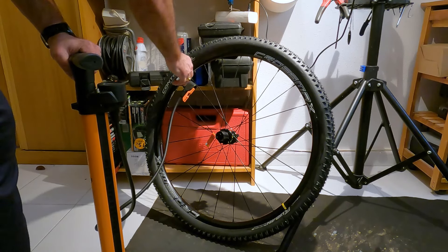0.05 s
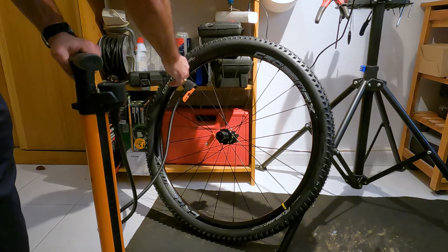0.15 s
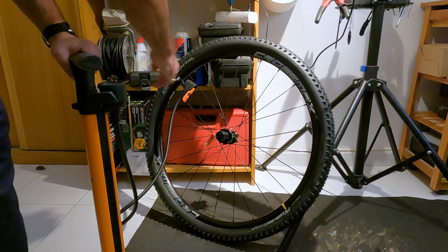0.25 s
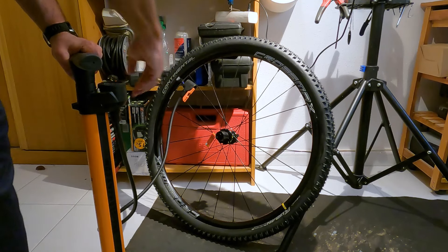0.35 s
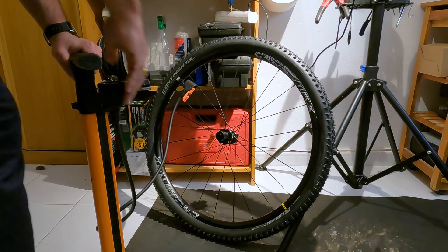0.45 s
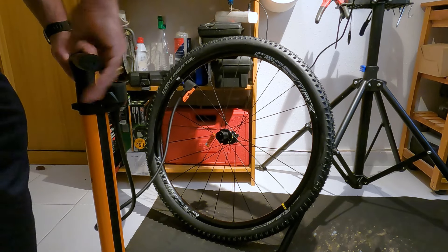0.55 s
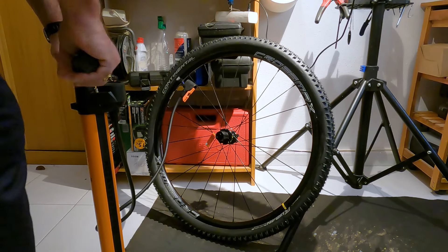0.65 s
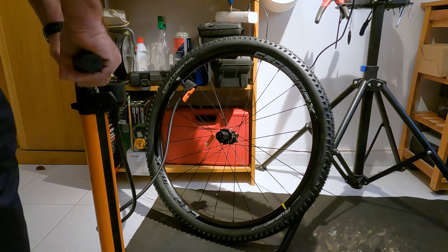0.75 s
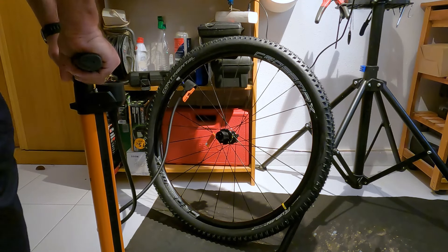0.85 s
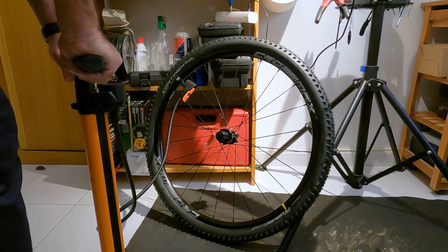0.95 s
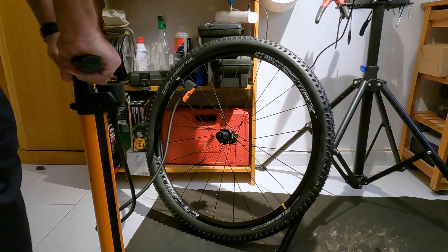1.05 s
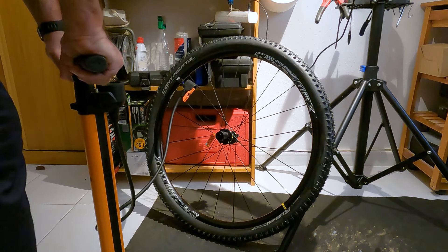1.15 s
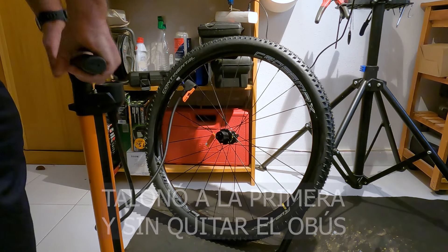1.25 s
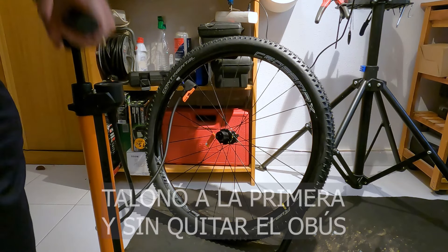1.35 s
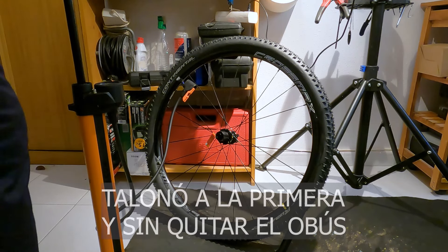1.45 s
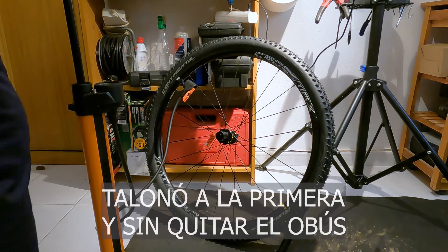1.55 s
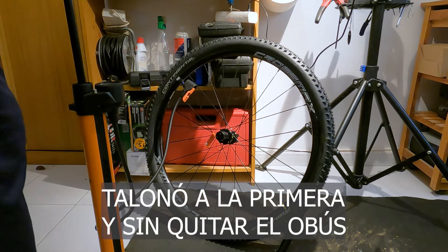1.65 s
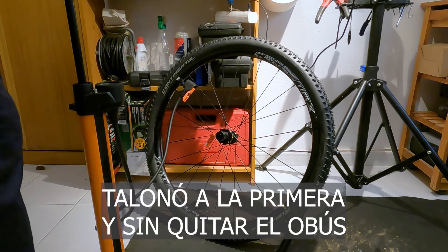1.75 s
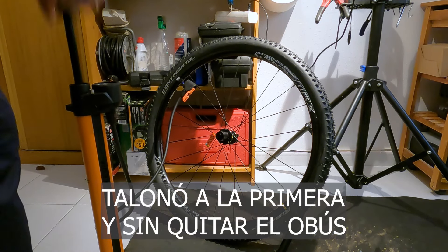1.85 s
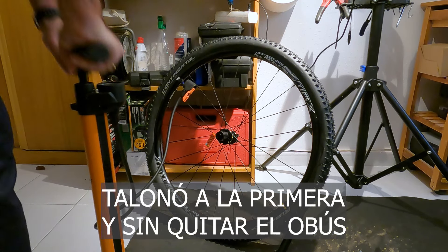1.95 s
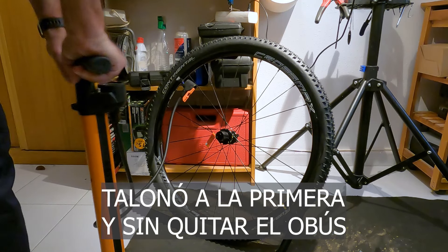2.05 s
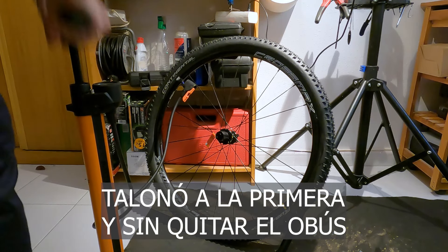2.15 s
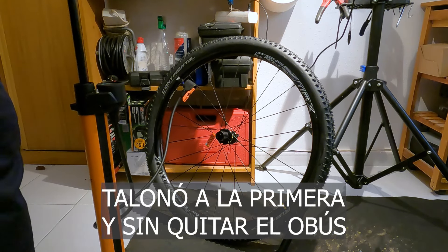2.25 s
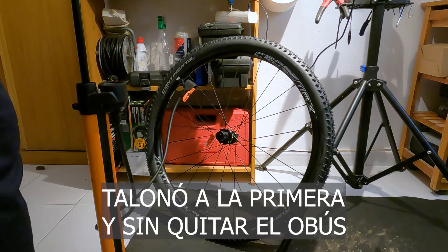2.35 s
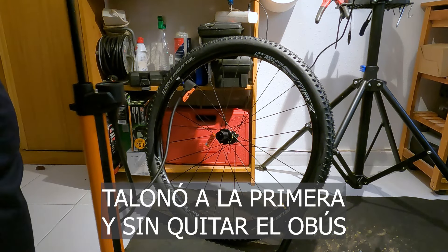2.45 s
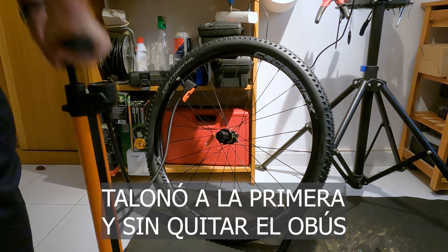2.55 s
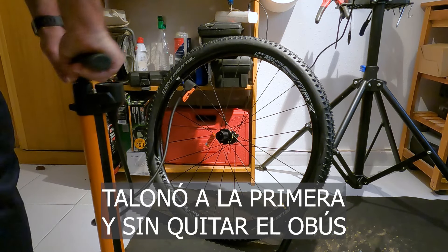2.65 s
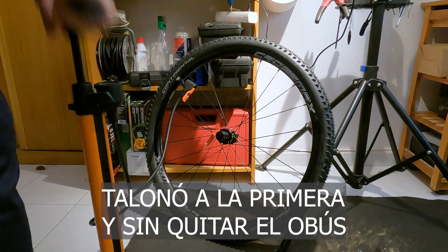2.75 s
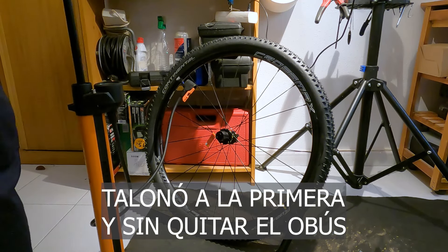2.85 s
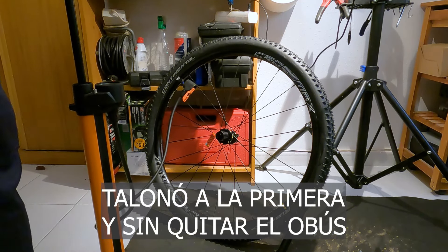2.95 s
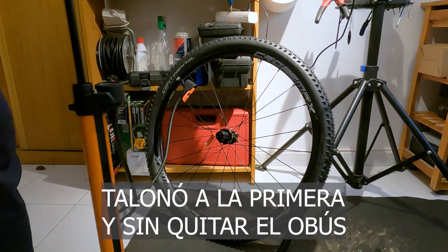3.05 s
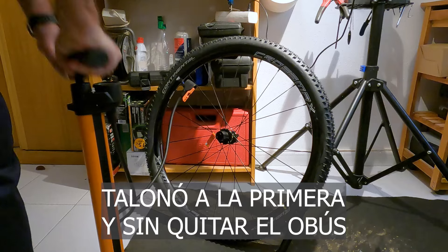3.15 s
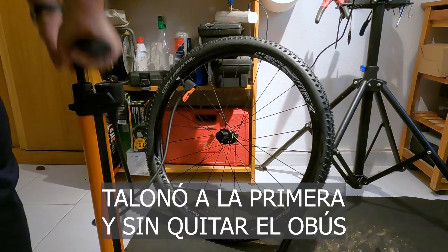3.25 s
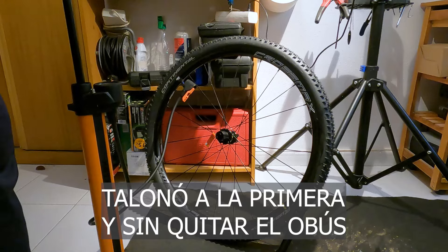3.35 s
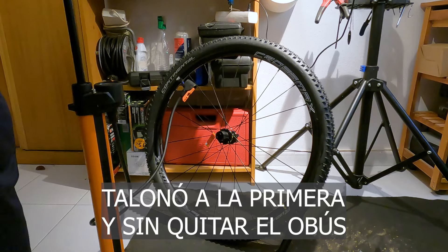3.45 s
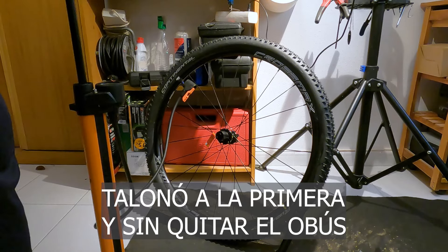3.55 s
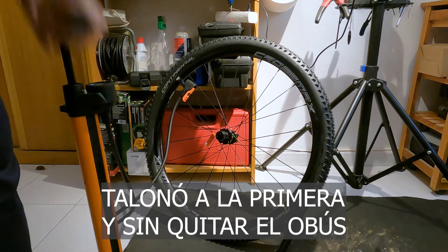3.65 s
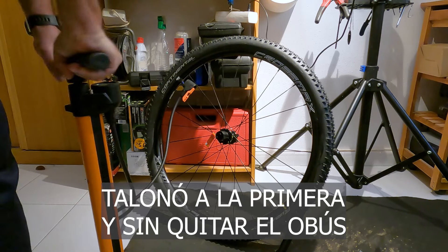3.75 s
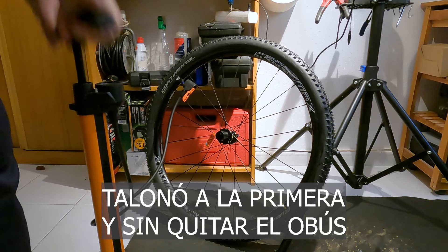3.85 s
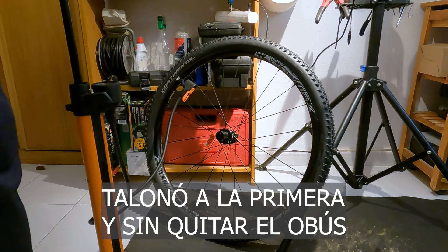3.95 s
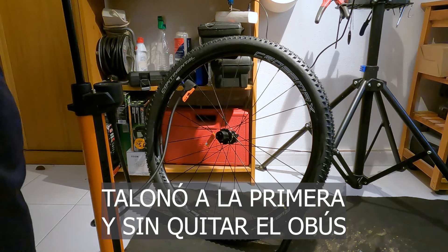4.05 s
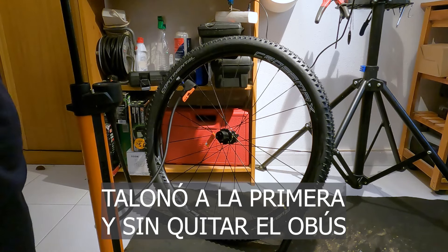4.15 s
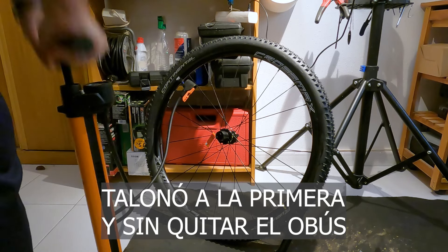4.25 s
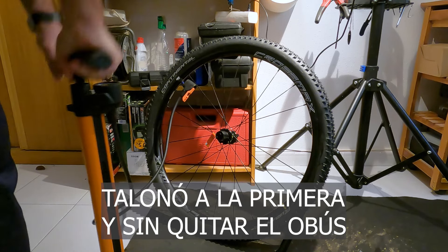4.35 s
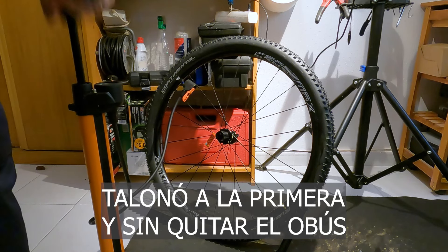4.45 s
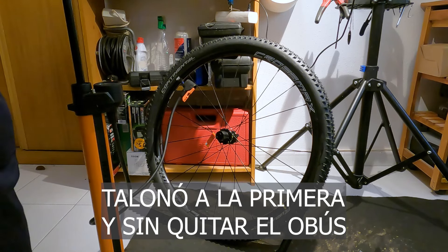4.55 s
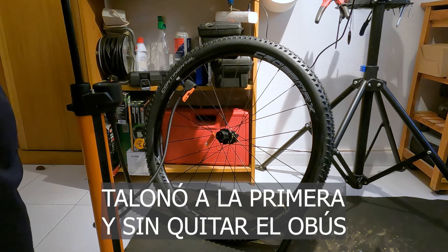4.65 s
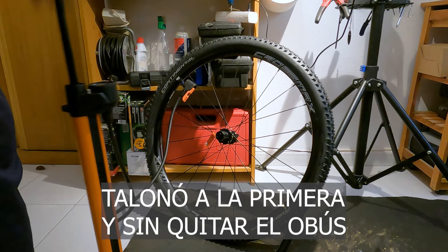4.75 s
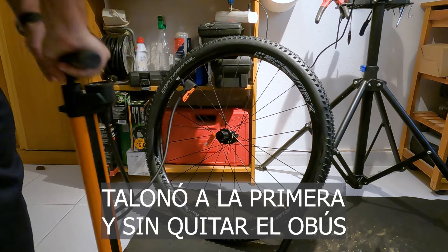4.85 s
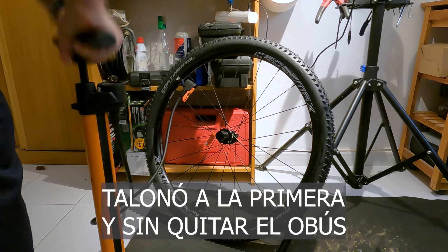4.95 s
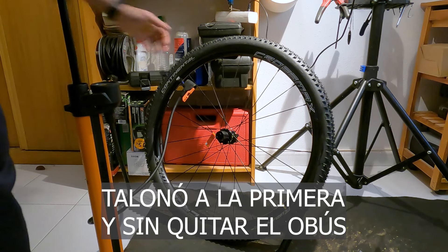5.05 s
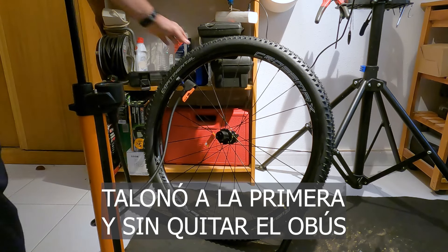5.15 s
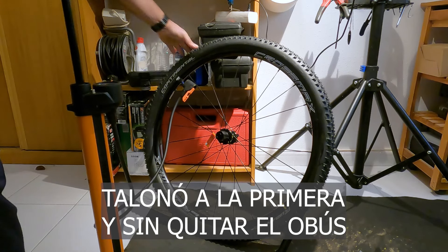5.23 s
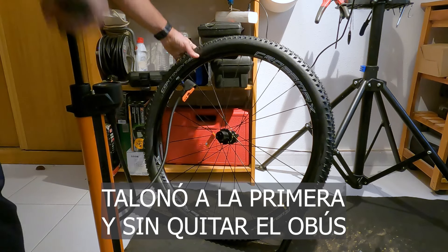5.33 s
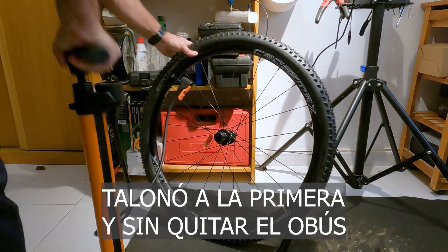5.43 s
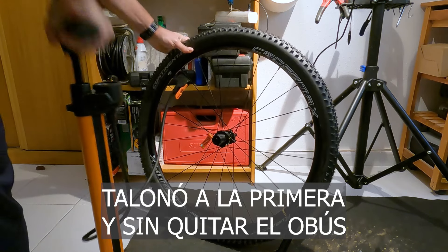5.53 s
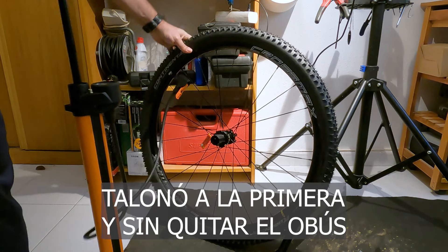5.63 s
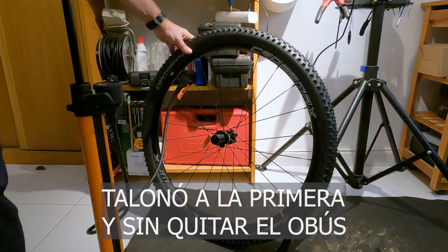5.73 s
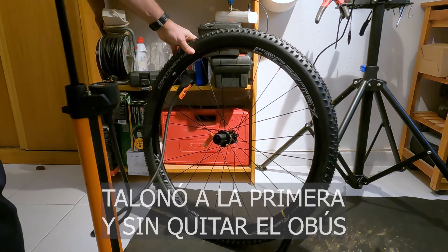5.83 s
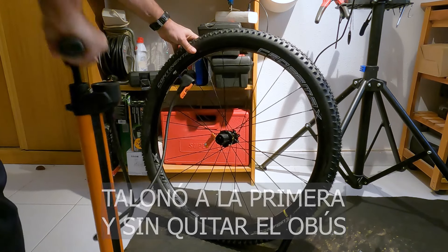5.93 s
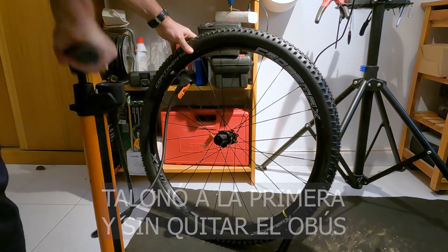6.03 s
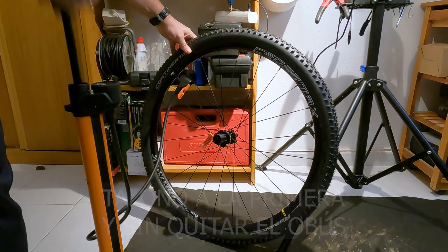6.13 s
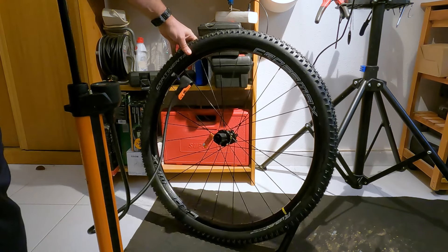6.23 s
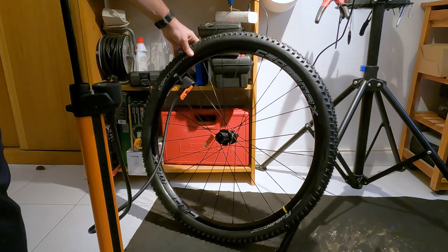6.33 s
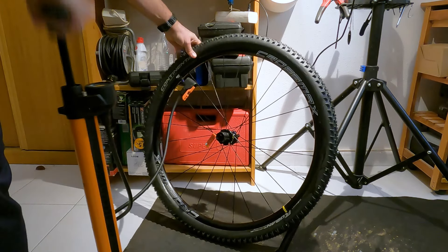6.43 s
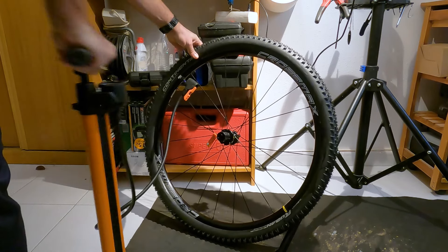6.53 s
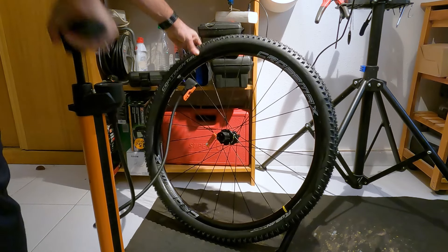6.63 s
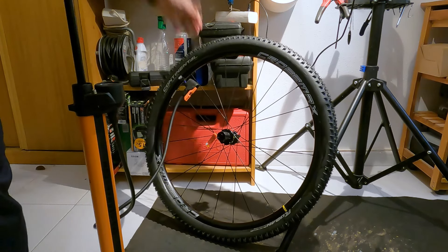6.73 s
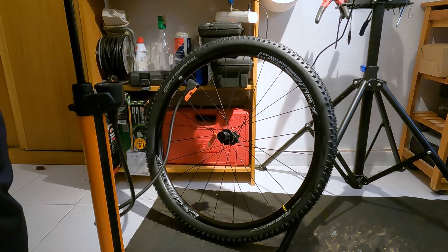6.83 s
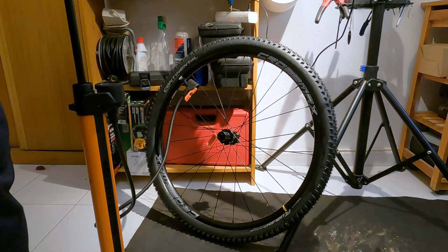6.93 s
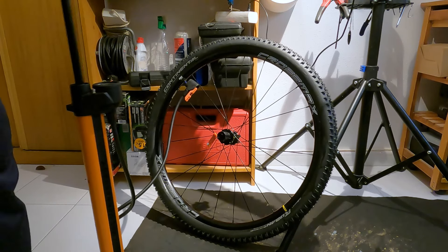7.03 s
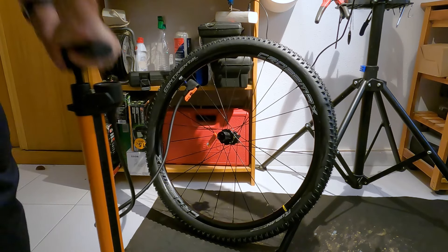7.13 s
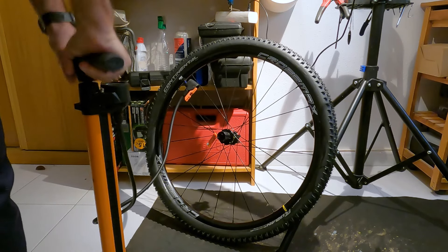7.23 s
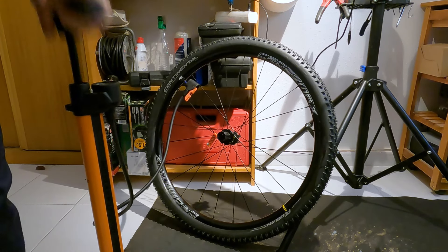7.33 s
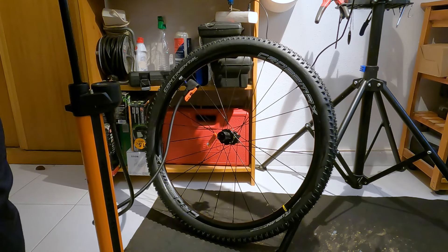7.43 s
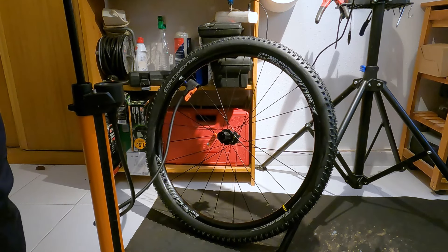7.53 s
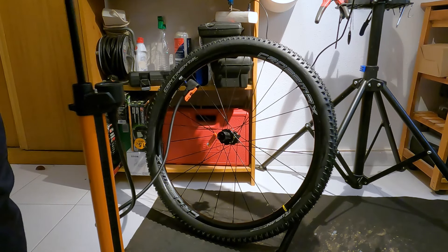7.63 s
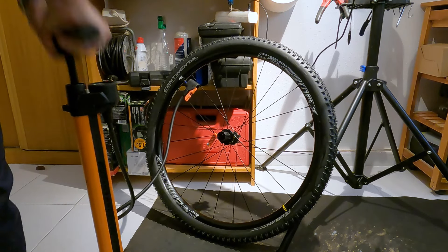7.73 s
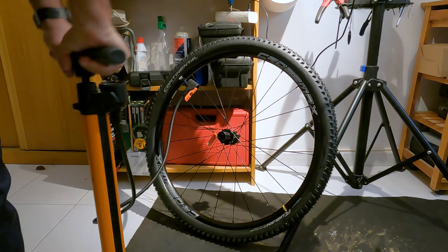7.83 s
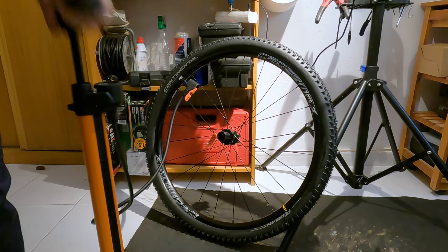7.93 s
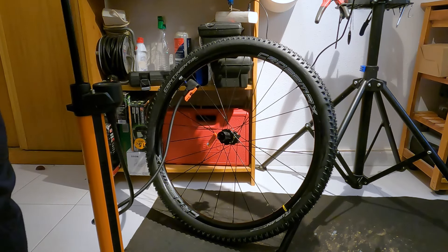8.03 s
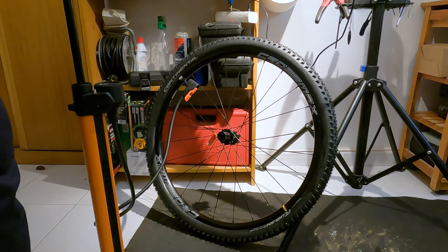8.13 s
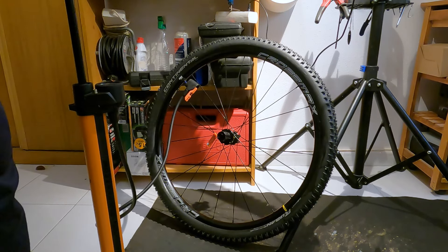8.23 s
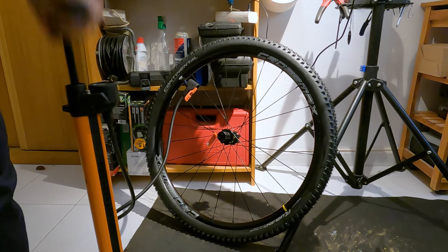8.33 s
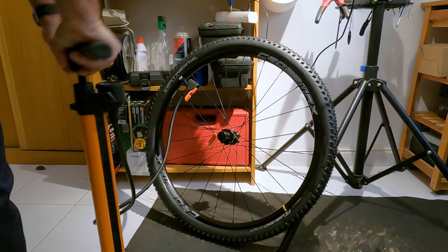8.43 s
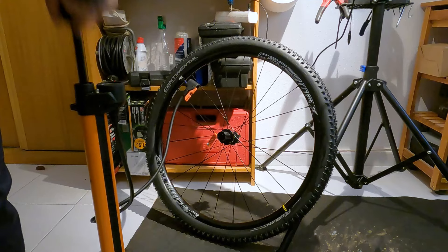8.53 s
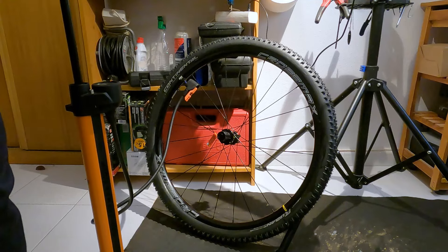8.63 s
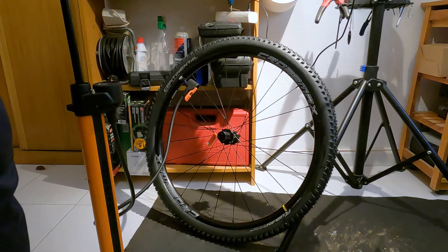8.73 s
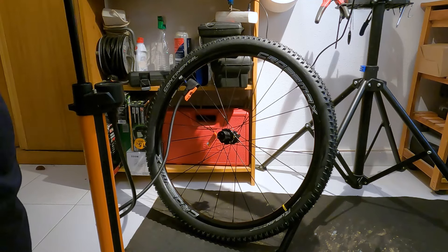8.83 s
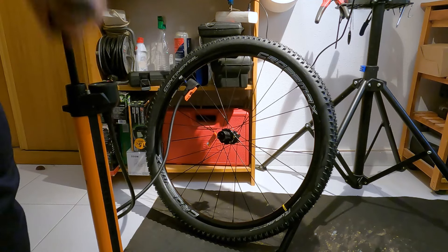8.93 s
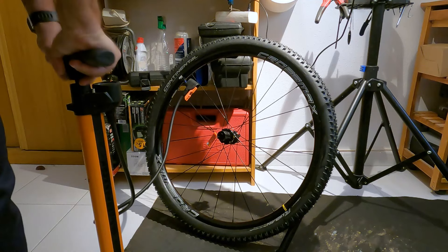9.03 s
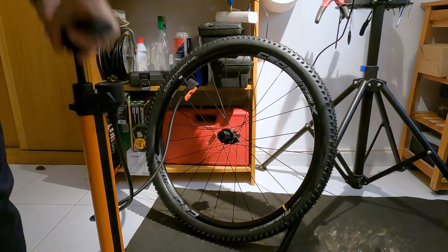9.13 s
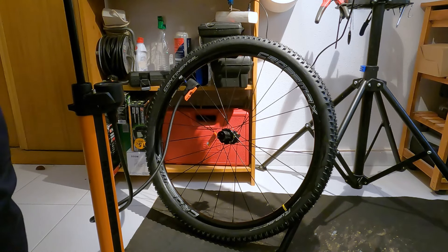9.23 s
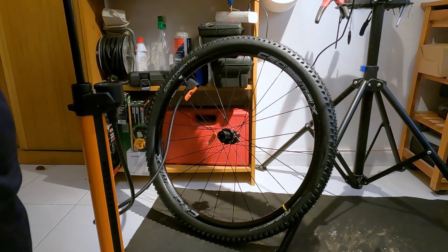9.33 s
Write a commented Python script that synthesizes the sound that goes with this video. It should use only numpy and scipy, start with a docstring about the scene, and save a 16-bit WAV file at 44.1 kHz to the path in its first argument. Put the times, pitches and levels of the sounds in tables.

```python
"""Pumping up a bicycle tyre

A floor pump seats a tyre on its rim in a small workshop. Shaped noise makes the hissing air, scraping seal,
palms and faint air between strokes, sliding shoe and rumbling floor. Short noise bursts and fading tones make
the clicks, knocks, clunks, thuds and ticks; the bead pops onto the rim with a crack and a hollow boom, and one
spoke hums on.
"""
import sys
import numpy as np
from scipy import signal
from scipy.fft import rfft, irfft, next_fast_len
from scipy.io import wavfile
from scipy.ndimage import uniform_filter1d, map_coordinates

SR = 44100
rng = np.random.default_rng(int(sys.argv[2]) if len(sys.argv) > 2 else 0)


def generate_wav(sig):
    """Save sig (samples, or channels by samples) to the path in sys.argv[1] as 16-bit PCM at SR."""
    pcm = np.round(np.clip(np.atleast_2d(sig).T, -1, 1) * 32767).astype(np.int16)
    wavfile.write(sys.argv[1], SR, pcm)


N = 413658

# pump strokes: start_s, rise_s (time to the fastest flow), valve_db (hiss), barrel_db (rush); relative levels
PUMP_STROKES = [(1.42, .27, -57, -49), (1.895, 0.23, -39, -41.5), (2.529, 0.23, -39, -38),
                (3.116, 0.19, -35.5, -35.5), (3.587, 0.3, -38, -35), (4.184, 0.27, -37.5, -37.5),
                (4.715, .29, -40, -37), (5.168, 0.4, -41, -38.5), (5.845, .28, -43, -37),
                (6.464, 0.23, -42.5, -38.5), (6.97, 0.33, -38.5, -38), (7.721, .22, -38.5, -38),
                (8.304, 0.25, -37.5, -38), (8.922, 0.26, -36, -35.5)]
# colour of a hard little snap: pitch_hz, level_db (per Hz)
SNAP_COLOUR = [(300, -43), (1300, -4), (2400, 2), (3200, 8), (5500, 15.5), (7000, 1), (8500, 2.5),
               (9600, 1.5), (11000, -3), (15000, -18)]


def amp(db):
    """Turn decibels into a gain."""
    return 10 ** (np.asarray(db) / 20)


def unit(x):
    """Scale a sound to an rms of 1."""
    return x / np.sqrt(np.mean(x ** 2) + 1e-20)


def along(points, hz):
    """Read values between (Hz, value) points, with frequency on a log axis."""
    f, v = np.transpose(points)
    return np.interp(np.log(hz + 1), np.log(f + 1), v)


def wobble(rate):
    """Draw a smooth random curve through `rate` random points a second."""
    points = rng.standard_normal(int(N * rate / SR) + 4)
    return map_coordinates(points, [np.arange(N) * rate / SR])


def filtered(x, response):
    """Multiply the spectrum of x by a response that depends on frequency."""
    n = x.shape[-1]
    padded = next_fast_len(n + SR // 10)
    hz = np.fft.rfftfreq(padded, 1 / SR)
    return irfft(rfft(x, padded) * response(hz), padded)[..., :n]


def spread(pair):
    """Turn two unrelated signals into a sound from all around, heard by two close microphones."""
    # stereo width: pitch_hz, level_db (side against middle)
    width = [(60, -28), (150, -12), (500, -10), (2000, -6.5), (5000, -6.5), (8000, -13.5), (12000, -6.5)]
    side = filtered(pair[1], lambda hz: amp(along(width, hz)))
    return np.array([pair[0] + side, pair[0] - side])


def rush(spectrum, patchy_db):
    """Make wide, coloured noise of rms 1 whose gain varies in random patches of time and pitch."""
    z = signal.stft(rng.standard_normal((2, N)), nperseg=512)[2]
    field = uniform_filter1d(rng.standard_normal(z.shape[1:]), size=5, axis=0)
    field = uniform_filter1d(field, size=9, axis=1)
    pair = signal.istft(z * amp(patchy_db * unit(field)), nperseg=512)[1][:, :N]
    coloured = filtered(pair, lambda hz: amp(along(spectrum, hz)))
    return unit(spread(coloured))


def fade(t60, attack):
    """Shape one blow: a quick rise, then a fall of 60 dB in t60 seconds."""
    t = np.arange(SR * 3 // 4) / SR
    return amp(-60 * t / t60) * (1 - np.exp(-t / attack))


def burst(colour_db, t60, attack):
    """Make a dying puff of coloured noise."""
    shape = fade(t60, attack)
    noise = filtered(rng.standard_normal(len(shape)), lambda hz: amp(colour_db(hz)))
    return shape * unit(noise)


def ring(modes, attack, scatter_db, detune):
    """Strike (Hz, dB, t60 s) modes at slightly new strengths and pitches; rms near 1 before the fade."""
    t = np.arange(SR * 3 // 4) / SR
    chance = rng.standard_normal((len(modes), 3))
    sizes = amp(np.array(modes)[:, 1] + scatter_db * chance[:, 0])
    waves = []
    for (hz, _, t60), (_, pitch_shift, phase) in zip(modes, chance):
        tone = np.sin(2 * np.pi * (hz * (1 + detune * pitch_shift) * t + phase))
        waves.append(tone * fade(t60, attack))
    return np.sqrt(2) * sizes @ np.array(waves) / np.linalg.norm(sizes)


def in_room(x, wet_db):
    """Add the workshop's answer: an echo tail of fresh noise that dies at its own rate at each pitch."""
    # workshop echo: pitch_hz, t60_s (time to fall 60 dB)
    echo_times = [(100, 0.32), (500, 0.39), (2000, 0.34), (6000, 0.45), (14000, 0.45)]
    hz, t, z = signal.stft(rng.standard_normal((2, SR // 2)), SR, nperseg=256)
    build_up = 1 - np.exp(-t / 0.0036)
    decay = amp(-60 * t / along(echo_times, hz)[:, None])
    tail = signal.istft(z * build_up * decay, SR, nperseg=256)[1]
    tail = spread(tail / np.linalg.norm(tail[0]))
    return x + amp(wet_db) * signal.fftconvolve(x[None], tail, axes=1)[:, :len(x)]


def add(track, s, sound):
    """Mix a sound into the track from s seconds on."""
    part = track[:, max(round(s * SR), 0):][:, :sound.shape[-1]]
    part += sound[..., :part.shape[1]]


def swell(s, length, crest):
    """Rise and fall smoothly, strongest at the given share of the length."""
    top = s + length * np.clip(crest, .05, .95)
    phase = np.interp(np.arange(N) / SR, [s, top, s + length], [0, np.pi / 2, np.pi])
    return np.sin(phase) ** 2


def chatter(contact):
    """Let a loose part hit and rebound twice after uneven, very short gaps, each contact weaker."""
    mean_gap_s, loss_db = .0028, 9.5
    gaps = mean_gap_s * rng.uniform(.5, 1.5, 2)
    sound = contact()
    for k, s in enumerate(np.cumsum(gaps), 1):
        later = np.pad(contact(), (round(s * SR), 0))[:len(sound)]
        sound = sound + amp(-loss_db * k) * later
    return sound


def off_tiles(x):
    """The tiled floor throws a fifth of the sound back 5.35 ms later."""
    return filtered(x, lambda hz: 1 + .2 * np.exp(-2j * np.pi * hz * .00535))


def quiet_workshop():
    """A faint, steady bed of coloured noise is the workshop's background."""
    # background colour: pitch_hz, level_db (per Hz)
    quiet_colour = [(25, -22), (86, -25), (202, -2.5), (360, -5.5), (673, -36), (1100, -11), (1670, -9.5),
                    (1860, -19), (2400, -14), (2650, -11), (3000, -23), (5000, -19), (9000, -29),
                    (11300, -25), (15000, -52)]
    return amp(-63.5) * rush(quiet_colour, patchy_db=.4)


def foot():
    """Weight shifts make the pump's foot rumble on the floor; the room's lowest mode swells a little later."""
    # shifts of weight: start_s, length_s, rumble_db (floor), boom_db (room)
    shifts = [(0.01, 0.33, -55.5, -51), (0.484, 0.41, -53.5, -45), (1.056, .29, -54, -42),
              (1.407, 0.29, -53, -50), (1.952, 0.7, -62, -42.5), (2.498, 0.26, -50, -40),
              (2.837, 0.29, -45.5, -53), (3.355, 0.3, -40.5, -35), (3.65, 0.29, -53, -48.5),
              (3.858, 0.33, -46, -39.5), (4.423, 0.35, -46.5, -34), (4.984, 0.36, -55, -44),
              (5.497, 0.51, -50, -58), (5.73, 0.34, -59, -48), (6.078, 0.21, -54, -43.5),
              (6.205, 0.27, -55.5, -50), (6.673, 0.26, -43, -43), (6.922, 0.33, -45.5, -64),
              (7.197, 0.32, -44, -62.5), (7.706, 0.19, -52, -47.5), (8.58, 0.34, -47.5, -75),
              (8.93, 0.2, -42.5, -54), (9.138, 0.35, -42.5, -38)]
    # floor colour: pitch_hz, level_db (per Hz)
    floor_colour = [(25, 1.5), (45, -4), (80, -8), (100, 3), (122, -6), (155, -1), (200, -8), (300, -11.5),
                    (500, -16), (900, -22.5), (2000, -36)]
    rumble_crest, boom_crest = 0.15, 0.36  # share of a swell's length at which it is strongest
    rest_db, lean_in_s = -58.5, 0.51  # rumble between shifts; it builds as weight comes onto the pump
    rumble = sum(amp(db) * swell(s, length, rumble_crest) for s, length, db, _ in shifts)
    boom = sum(amp(db) * swell(s, length, boom_crest) for s, length, _, db in shifts)
    resting = amp(rest_db) * np.clip(np.arange(N) / SR / lean_in_s, 0, 1)
    mode_hz = 62.5 + 3 * wobble(15)
    mode = np.sqrt(2) * np.sin(2 * np.pi * np.cumsum(mode_hz) / SR)
    tiles = rush(floor_colour, patchy_db=2.2)
    return boom * mode + (rumble + resting) * tiles


def shoe():
    """A sole slides briefly over the tiles as the stance is taken: one swell of noise."""
    # sole colour: pitch_hz, level_db (per Hz)
    sole_colour = [(150, -5), (320, -8), (570, 4), (830, -7), (980, 6), (1250, -7), (1520, 1), (1900, -2),
                   (2200, -2.5), (4000, -5), (5500, -7), (7500, -6), (10000, -17.5), (15000, -23)]
    slide = swell(0.775, 0.34, crest=0.42) ** 2.6  # the power narrows the swell
    return amp(-44) * slide * rush(sole_colour, patchy_db=2.5)


def thuds():
    """The pump rocks on its foot and gives a few round, low cycles: two fading tones for each thud."""
    # soft thuds: start_s, level_db (relative), pitch_hz, t60_s (time to fall 60 dB)
    thud_table = [(1.109, -29.5, 134, 0.057), (3.295, -25, 153, 0.25), (3.369, -20, 170, 0.099),
                  (3.47, -18.5, 108, 0.17), (3.888, -16.5, 155, 0.15), (6.037, -18.5, 135, 0.017),
                  (6.72, -23.5, 150, 0.12), (8.616, -33.5, 182, 0.15), (9.167, -18.5, 150, 0.19),
                  (9.213, -19, 189, 0.093)]
    track = np.zeros((2, N))
    for s, db, hz, t60 in thud_table:
        modes = [(hz, 0, t60), (hz * 1.3, -9, t60 * .7)]
        thud = ring(modes, attack=t60 / 24, scatter_db=1.5, detune=.01)
        add(track, s, amp(db - 7) * in_room(thud, wet_db=-4.0))
    return track


def palms_and_faint_air():
    """Palms rub on hose and grip; later swells are faint air noise between pump strokes."""
    # soft noise swells: start_s, length_s, level_db
    soft_swells = [(-.1, 0.3, -59.5), (0.489, 0.22, -48), (1.23, 0.18, -55), (1.395, 0.14, -47),
                   (1.75, 0.085, -48.5), (2.385, 0.38, -49.5), (2.946, 0.23, -51), (8.79, 0.11, -58)]
    # colour of the soft noise: pitch_hz, level_db (per Hz)
    soft_colour = [(150, -52), (250, 10.5), (589, 0.5), (984, -7), (1320, 4), (1540, -1.5), (3940, -0.5),
                   (7690, -2.5), (15000, -30)]
    loudness = sum(amp(db) * swell(s, length, crest=0.31) for s, length, db in soft_swells)
    return loudness * amp(3.3 * wobble(59.77)) * rush(soft_colour, patchy_db=-0.5)


def clunks():
    """The piston rod knocks against its guide and the barrel's modes ring briefly and hollowly."""
    # clunks: start_s, level_db (relative)
    clunk_table = [(1.108, -46), (1.257, -35.5), (1.424, -28.5), (3.391, -36), (3.771, -32), (4.004, -30.5),
                   (5.158, -30), (5.715, -29), (6.268, -34.5), (6.952, -31), (7.746, -34.5), (8.104, -30),
                   (8.372, -35)]
    # barrel modes: pitch_hz, level_db, t60_s (time to fall 60 dB)
    barrel_modes = [(215, -2, 0.093), (332, 0.5, 0.083), (421.5, -1, 0.1), (537, 2, 0.03), (763, -4, 0.087),
                    (1180, 5, 0.033)]
    track = np.zeros((2, N))
    for s, db in clunk_table:
        tube = ring(barrel_modes, attack=.001, scatter_db=3, detune=.03)
        add(track, s, amp(db - 6.0) * in_room(tube, wet_db=-1.0))
    return track


def squeaks():
    """The piston seal briefly sings on the barrel wall: a tone of unsteady pitch."""
    # squeaks: start_s, length_s, pitch_hz, level_db (before the room)
    squeak_table = [(1.737, 0.072, 2240, -54), (1.895, .045, 2344, -45.5), (2.08, 0.026, 2100, -38),
                    (3.76, 0.086, 1540, -41.5), (5.524, 0.057, 972, -41), (5.576, .05, 1490, -37.5),
                    (8.491, 0.043, 998, -43)]
    track, t = np.zeros((2, N)), np.arange(N) / SR
    for s, length, hz, db in squeak_table:
        loudness = np.sin(np.pi * np.clip((t - s) / length, 0, 1))
        unsteady_hz = hz * (1 + 0.0195 * wobble(200))
        tone = np.sin(2 * np.pi * np.cumsum(unsteady_hz) / SR)
        track += amp(db) * in_room(loudness * tone, wet_db=-4)
    return track


def rasp(per_s):
    """The seal sticks and slips: uneven clusters of tiny scratches set the power of a noise."""
    # rasp colour: pitch_hz, level_db (per Hz)
    rasp_colour = [(500, -18), (1000, -5.5), (1700, -10.5), (2600, 3.5), (3300, -2.5), (4900, 1.5),
                   (6500, -6), (14000, -38)]
    chance = per_s / SR * amp(5 * wobble(10))  # the rate wanders, so slips come in clusters
    slips = (rng.random(N) < chance) * rng.uniform(.3, 1, N)
    power = np.abs(signal.fftconvolve(slips ** 2, fade(.022, .0003) ** 2)[:N])
    return unit(np.sqrt(power) * rush(rasp_colour, patchy_db=3.5))


def scrapes():
    """The dry seal catches on the barrel wall in short, coarse scrapes: swells of dense stick and slip."""
    # scrapes: start_s, length_s, level_db (relative)
    scrape_table = [(3.82, 0.11, -32.5), (4.396, 0.082, -33), (4.96, 0.093, -31), (7.928, .04, -38),
                    (9.114, 0.11, -28)]
    loudness = sum(amp(db) * swell(s, length, crest=0.38) for s, length, db in scrape_table)
    return loudness * rasp(per_s=900)


def creep():
    """The rubber ticks while a hand presses on the tyre: scattered tiny bursts as the bead creeps."""
    start_s, length_s, ticks_per_s, strongest_db = 5.45, 1, 22, -32.5
    track = np.zeros((2, N))
    ticks = rng.random((round(ticks_per_s * length_s), 2))
    for when, weakness in ticks:
        tick = burst(lambda hz: along(SNAP_COLOUR, hz), t60=.012, attack=.0001)
        add(track, start_s + when * length_s, amp(strongest_db - 10 * weakness) * in_room(tick, wet_db=-23))
    return track


def knocks():
    """Handle and tyre give short, loose, dull knocks; the lower their pitch, the longer they ring."""
    # knocks: start_s, level_db (relative), pitch_hz (centre)
    knock_table = [(0.5, -31.5, 1046), (0.548, -36.5, 2140), (1.11, -36.5, 1740), (1.257, -39.5, 990),
                   (1.421, -27, 2006), (1.425, -25, 1365), (1.457, -34.5, 1400), (1.968, -21.5, 2460),
                   (2.117, -29.5, 960), (2.311, -23, 2400), (2.314, -34, 720), (3.124, -21, 1455),
                   (3.444, -17.5, 2580), (4.005, -25.5, 2380), (4.104, -23.5, 2610), (4.239, -24, 1475),
                   (4.5943, -13.5, 2880), (4.598, -20, 3210), (4.772, -19, 3490), (4.779, -20, 3380),
                   (5.178, -24, 1400), (5.516, -26, 2160), (5.731, -22, 1370), (5.846, -27, 1375),
                   (6.037, -45, 590), (6.29, -20, 2960), (6.433, -26.5, 1440), (6.809, -18.5, 3550),
                   (6.829, -27, 1400), (7.004, -22, 684), (7.022, -24.5, 900), (7.478, -16.5, 1490),
                   (8.084, -20, 3430), (8.371, -22, 1450), (8.584, -22, 2830), (8.708, -22, 1320),
                   (8.736, -19, 2635), (8.915, -20, 3780), (9.235, -22.5, 2330), (9.327, -30, 1045)]
    track = np.zeros((2, N))
    for s, db, centre_hz in knock_table:
        hump = [(centre_hz / 8, -19), (centre_hz / 2, -8), (centre_hz, 0),
                (centre_hz * 2, -11), (centre_hz * 4, -21), (centre_hz * 12, -52)]
        knock = chatter(lambda: burst(lambda hz: along(hump, hz), t60=0.023, attack=0.00013))
        t60 = 0.018 + 23 / centre_hz  # a fixed time in seconds plus 23 cycles
        modes = [(centre_hz * .91, -8, t60), (centre_hz, 0, t60), (centre_hz * 1.12, -4, t60)]
        body = ring(modes, attack=.0006, scatter_db=2, detune=.01)
        add(track, s, amp(db - 6.5) * in_room(knock + amp(-4) * body, wet_db=-0.5))
    return track


def clicks():
    """Hard snaps: the valve clicks, and at 2.18 s and 7.37 s the bead snaps as it pops. Each is a hard,
    chattering edge, a short clatter and a faint ring."""
    # clicks: start_s, level_db (relative), brightness_hz (a higher value shifts the colour up)
    click_table = [(0.4998, -35.5, 3700), (1.969, -22, 4870), (2.172, -17, 5060), (2.1809, -16.5, 3400),
                   (2.3398, -19.5, 4750), (2.5328, -14, 4600), (2.805, -32, 6630), (2.8654, -16.5, 2780),
                   (3.172, -21.5, 6370), (3.19, -30, 5830), (3.5862, -10, 9600), (3.6335, -17.5, 5390),
                   (3.658, -9.5, 5700), (3.711, -10, 5770), (3.7177, -15.5, 5000), (4.1845, -8.5, 5140),
                   (4.2171, -12, 5400), (4.243, -8.5, 5650), (4.7151, -9.5, 6800), (4.814, -10, 6100),
                   (4.88, -24, 5900), (5.029, -22, 6100), (5.154, -27, 5150), (5.178, -22.5, 5900),
                   (5.201, -25, 4500), (5.262, -23, 4870), (5.52, -21, 7040), (5.5918, -15, 3960),
                   (5.743, -16, 5100), (5.845, -7.5, 6300), (5.9486, -9, 9160), (6.129, -17.5, 8140),
                   (6.147, -19, 4380), (6.234, -23, 3960), (6.7232, -18, 4700), (6.9697, -10.5, 4840),
                   (7.0412, -15, 3160), (7.087, -10.5, 6960), (7.3668, -13.5, 4650), (7.7217, -14, 5400),
                   (8.186, -28.5, 4000), (8.304, -11, 6100), (8.366, -12, 5750), (8.885, -15, 6150),
                   (8.9304, -8.5, 5770), (8.982, -12.5, 5700), (8.989, -16.5, 6200)]
    # valve body modes: pitch_hz, level_db, t60_s (time to fall 60 dB)
    valve_modes = [(1352, -6.5, 0.15), (2900, 7, 0.023), (3500, -3, 0.011), (4560, -11, 0.01),
                   (5344, 23, 0.0084), (6687, 17, 0.02), (9660, 2.5, 0.042)]
    track = np.zeros((2, N))
    for s, db, brightness_hz in click_table:
        colour = lambda hz: along(SNAP_COLOUR, hz * (5700 / brightness_hz) ** .5)
        brighter = lambda hz: colour(hz / 1.25)
        edge = amp(-3.5) * chatter(lambda: burst(brighter, t60=.009, attack=.00015))
        clatter = amp(-8) * burst(colour, t60=.034, attack=.0007)
        body = amp(-6.5) * ring(valve_modes, attack=.0003, scatter_db=3, detune=.015)
        add(track, s, amp(db) * in_room(edge + clatter + body, wet_db=-2.5))
    return track


def spoke():
    """The hardest pop leaves one taut spoke humming on faintly: a slowly fading sine."""
    start_s, pitch_hz, level_db, t60_s = 5.271, 479, -48.5, 2.8
    t = np.maximum(np.arange(N) / SR - start_s, 0)
    return amp(level_db - 60 * t / t60_s) * np.sin(2 * np.pi * pitch_hz * t)


def pops():
    """The bead jumps onto the rim: it cracks, the sidewall slaps, rim and casing ring, the room booms."""
    # pops: start_s, crack_db, rise_s (crack), dull_hz (crack dull above), rim_db (rim and spokes),
    # boom_db (room), casing_db, slap_db (sidewall); all levels relative
    pop_table = [(2.1814, -16, 0.00036, 3800, -35.5, -21, -16, -20.5),
                 (3.382, -38, 0.0011, 2000, -57, -46, -27, -33),
                 (3.492, -24.5, 0.00054, 1880, -45, -36.5, -29.5, -36.5),
                 (4.505, -25, .00042, 2260, -45, -35, -44, -28.5),
                 (5.271, -8, 0.0015, 1950, -28.5, -28.5, -15, -25),
                 (7.368, -16.5, .00064, 3800, -34.5, -23, -18, -21)]
    # colours of crack and slap: pitch_hz, level_db (per Hz)
    crack_colour, slap_colour = [(200, -5), (520, -11), (740, -5), (880, -13), (1050, -8), (1300, -3),
                                 (1850, -0.5), (2350, -2.5), (3000, -1.5), (6000, -19), (14000, -37)], [(150, 3.5), (250, 4.5), (350, 3), (560, -0.5), (750, -11.5),
                                                (950, -4.5), (3000, -42)]
    # modes of rim with spokes, and of the inflated casing: pitch_hz, level_db, t60_s (time to fall 60 dB)
    rim_modes, casing_modes = [(650, -9, 0.24), (753, -2.5, 0.092), (1025, 1, 0.19), (1180, -4, .13),
                               (1324, -9, 0.29), (1557, 1.5, .18), (1810, 1.5, 0.13), (2050, -8, 0.16)], [(96.8, -12, 0.61), (149.6, 8, 0.21), (186, -1, 0.24),
                                            (249, -10, 0.31), (294.5, 0, 0.17), (358, -12, 0.3),
                                            (419, -14, 0.25), (488, -25, 0.26), (556, -24, 0.17)]
    track = np.zeros((2, N))
    for s, crack_db, rise_s, dull_hz, rim_db, boom_db, casing_db, slap_db in pop_table:
        dulling = [(dull_hz, 0), (dull_hz * 1.3, -10), (dull_hz * 3, -20)]
        crack = burst(lambda hz: along(crack_colour, hz) + along(dulling, hz), t60=0.033, attack=rise_s)
        rim = amp(rim_db + 6.5) * ring(rim_modes, attack=.0015, scatter_db=1.5, detune=.004)
        slap = amp(slap_db + 2.0) * burst(lambda hz: along(slap_colour, hz), t60=0.19, attack=0.0033)
        casing = amp(casing_db - 0.5) * ring(casing_modes, attack=.004, scatter_db=1.5, detune=.008)
        boom = ring([(62.3, 0, 0.36)], attack=0.094, scatter_db=0, detune=0.0081)
        # the crack is a little louder on the left
        add(track, s, in_room(amp(crack_db) * crack, wet_db=1.5) * amp([[.5], [-.5]]))
        add(track, s, in_room(casing + rim + slap, wet_db=-3.5))
        add(track, s, amp(boom_db + 16.5) * boom)
    return track


def flow(levels_db, shape):
    """Each stroke opens to a steady flow, swells to a crest and dies away while the handle turns."""
    open_s, stop_s = 0.012, 0.36  # the valve opens; the flow stops this long after the crest
    steady_db, crest_s, fall_db_per_s = shape
    t, power = np.arange(SR) / SR, np.zeros((1, N))
    for (s, rise, *_), db in zip(PUMP_STROKES, levels_db):
        late = t - rise
        after = np.maximum(late, 0)
        crest_db = steady_db * (1 - np.exp(-(late / crest_s) ** 2))
        opening = 1 - np.exp(-t / open_s)
        closing = np.exp(-(after / stop_s) ** 4)
        stroke = amp(db + crest_db - fall_db_per_s * after) * opening * closing
        add(power, s, stroke ** 2)
    return np.sqrt(power[0])


def air_column():
    """Noise rings in the barrel's two lowest resonances, which climb as the air column shortens."""
    fastest_hz, rise_oct_per_s, wander_oct = 1877, 4.65, 0.24  # pitch at the fastest flow, before wander
    width_oct = 0.044  # half-width of each resonance
    hz, t, z = signal.stft(rng.standard_normal((2, N)), SR, nperseg=1024, noverlap=768)
    starts, rises, _, _ = np.transpose(PUMP_STROKES)
    stroke = np.maximum(np.searchsorted(starts, t) - 1, 0)
    late = t - (starts + rises)[stroke]
    drift = wander_oct * np.interp(t, np.arange(N) / SR, wobble(18))
    pitch = np.log2(fastest_hz) + rise_oct_per_s * np.clip(late, -.16, .05) + drift  # log2 of Hz
    gain = 0
    for k in (1, 2):
        distance_oct = np.log2((hz[:, None] + 1) / k) - pitch
        gain = gain + 1 / (1 + (distance_oct / width_oct) ** 2) / k
    strength = 2.4 + np.exp(-(late / 0.24) ** 2)
    # a higher resonance is wider in Hz, so its gain is lowered to match
    shaped = z * gain * strength / 2 ** (pitch / 2)
    return unit(spread(signal.istft(shaped, SR, nperseg=1024, noverlap=768)[1][:, :N]))


def air():
    """Air hisses through the valve, its jet rising with the flow, and flutters in the barrel as the piston drags."""
    # colours of hiss, jet and barrel rush: pitch_hz, level_db (per Hz)
    hiss_colour, jet_colour, barrel_colour = [(1500, -18), (3200, -11), (4400, 0.5), (5100, 2), (6400, -3),
                                              (7500, 6.5), (8200, -3.5), (9200, 1), (10500, -8.5),
                                              (12500, -2), (16000, -18)], [(6000, -33), (6800, -4), (7200, 4), (7750, 6),
                                                            (8150, -9), (8600, -4.5), (9050, 10),
                                                            (9450, -23), (11500, -28), (16000, -50)], [(200, -3.5), (500, -5),
                                                                         (720, -10.5), (1000, -1.5),
                                                                         (1200, -4.5), (1430, 6.5),
                                                                         (1800, -1.5), (2100, 1),
                                                                         (2400, -1), (2750, -4), (3500, -4),
                                                                         (6000, 0.5), (9000, -9.5),
                                                                         (15000, -18)]
    # shape of a stroke: steady_db (against the crest), crest_s (half-width), fall_db_per_s (after it)
    valve_shape, barrel_shape = (-12, 0.077, 3.3), (-3, 0.052, 8.6)
    _, _, valve_db, barrel_db = np.transpose(PUMP_STROKES)
    valve, barrel = flow(valve_db, valve_shape), flow(barrel_db, barrel_shape)
    flutter = wobble(35)
    hiss = rush(hiss_colour, patchy_db=1.6)
    # reading the jet's noise faster raises its pitch slightly as the flow grows
    speed = np.clip(valve / valve.max() * 1.3, .1, 1) ** .045
    place = np.cumsum(speed)
    jet_noise = rush(jet_colour, patchy_db=2.2)
    jet = np.array([map_coordinates(side, [place], order=5, mode="mirror") for side in jet_noise])
    draught = rush(barrel_colour, patchy_db=2.6)
    push = np.minimum(valve / amp(-27.0), 1) ** 0.3  # the narrow jet sings more as the flow grows
    nozzle = amp(2.5) * hiss + push * jet
    slips = (rng.random(N) < 25 / SR) * rng.uniform(.5, 2.2, N)  # about 25 a second
    grain = 1 + signal.fftconvolve(slips, fade(.02, .0002))[:N]
    tube = amp(-4) * grain * draught + amp(-15) * air_column() + amp(-9.5) * rasp(per_s=82)
    return valve * amp(0.67 * flutter) * nozzle + barrel * amp(2.5 * flutter) * tube


def scene():
    """The pump stands a little to the left, over the workshop's quiet background."""
    left_lag_s = .000008  # the left microphone hears the pump a little later
    pump = off_tiles(air() + palms_and_faint_air() + scrapes() + clicks() + knocks() + creep())
    pump = pump + squeaks() + thuds() + clunks() + shoe()
    halves = np.array([[-1], [1]])  # half the lag on each side
    pump = filtered(pump, lambda hz: np.exp(1j * np.pi * hz * left_lag_s * halves))
    pump = pump * amp([[.8], [-.8]])  # a little louder on the left
    return pump + pops() + spoke() + foot() + quiet_workshop()


def record(dry):
    """Cut the deepest bass, dull the highest treble and remove nearly everything above the band limit."""
    # microphone tone: pitch_hz, level_db
    microphone_tone = [(9500, 2), (12000, -7), (14500, -10.5), (15500, -18)]
    low_cut_hz, top_hz = 46, 15650
    bass_cut = signal.butter(5, low_cut_hz, "highpass", fs=SR, output="sos")
    lean = signal.sosfilt(bass_cut, dry)
    toned = filtered(lean, lambda hz: amp(along(microphone_tone, hz)))
    return filtered(toned, lambda hz: 1 / np.sqrt(1 + (hz / top_hz) ** 160))


dry = scene()
out = record(dry)
generate_wav(out)
```